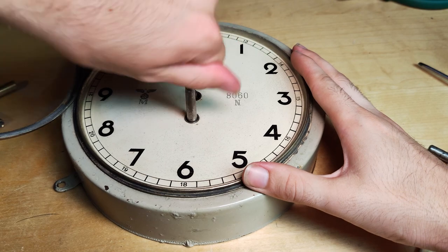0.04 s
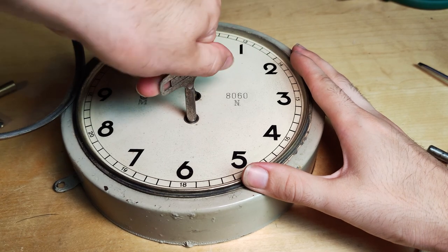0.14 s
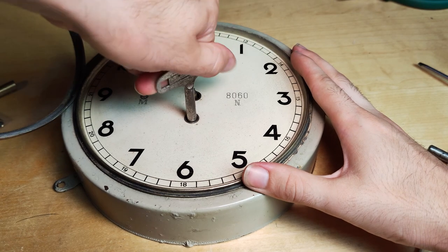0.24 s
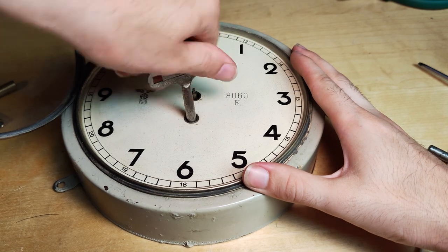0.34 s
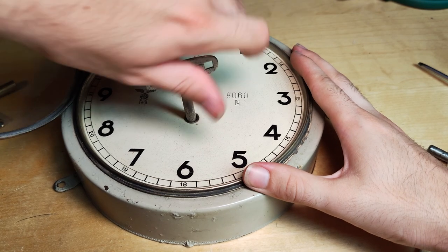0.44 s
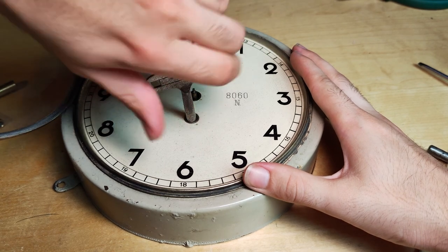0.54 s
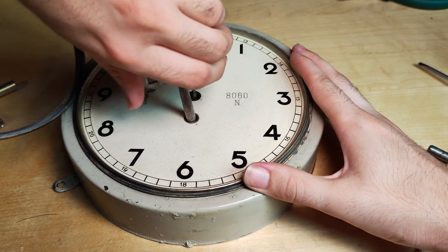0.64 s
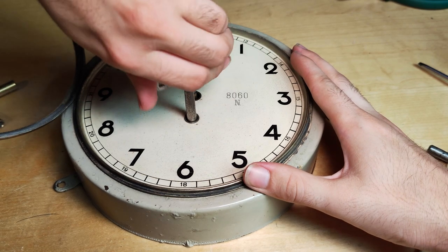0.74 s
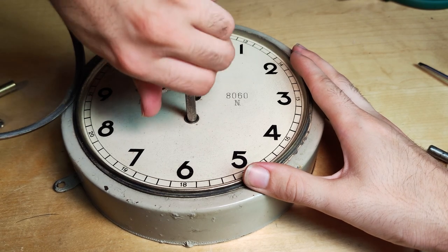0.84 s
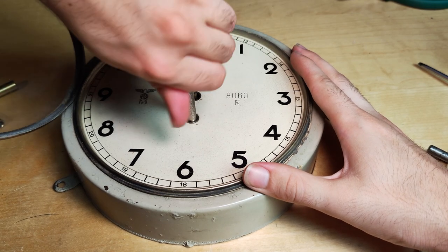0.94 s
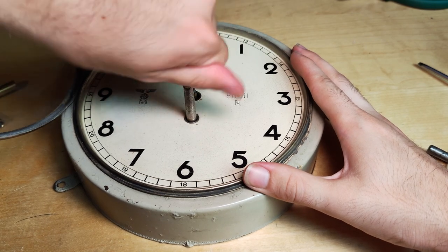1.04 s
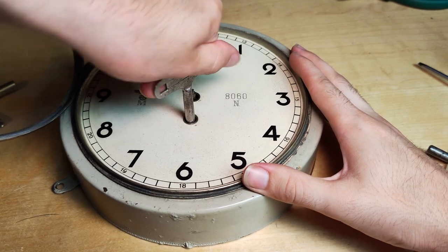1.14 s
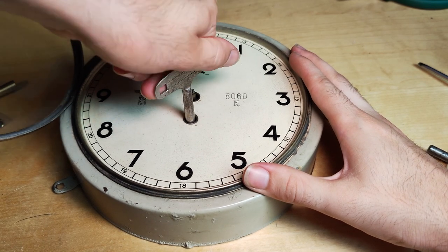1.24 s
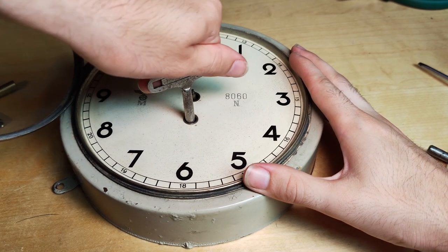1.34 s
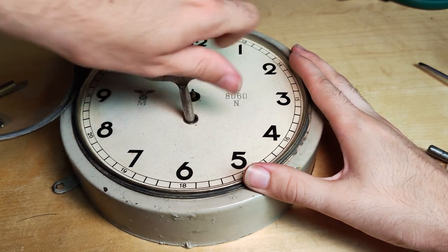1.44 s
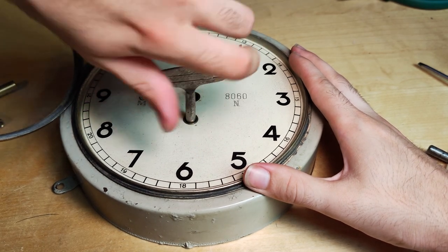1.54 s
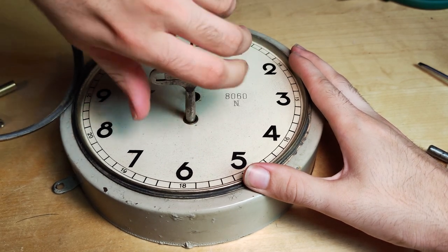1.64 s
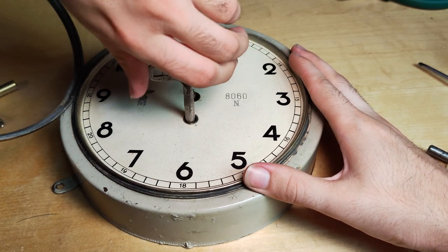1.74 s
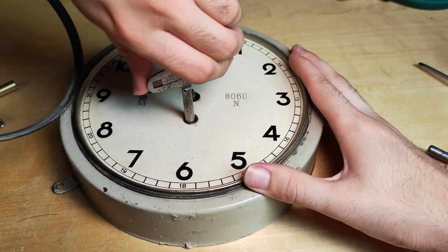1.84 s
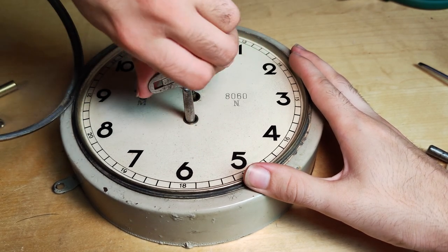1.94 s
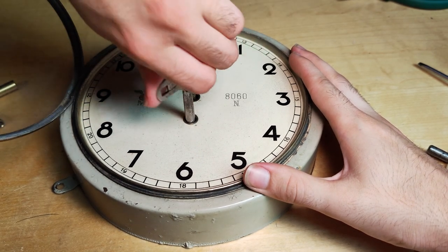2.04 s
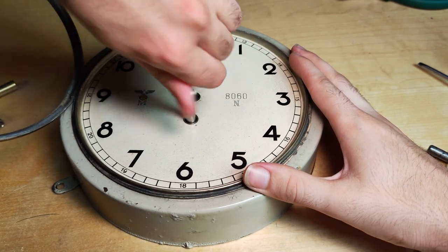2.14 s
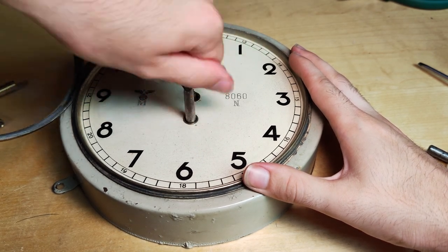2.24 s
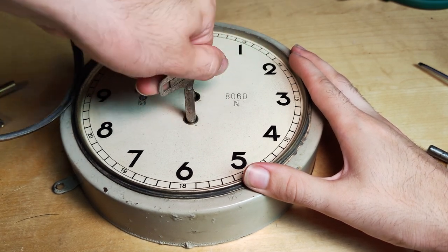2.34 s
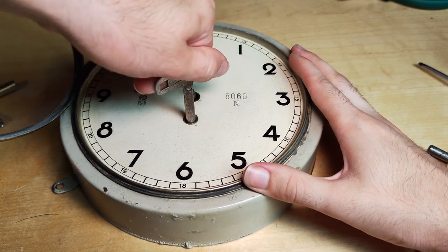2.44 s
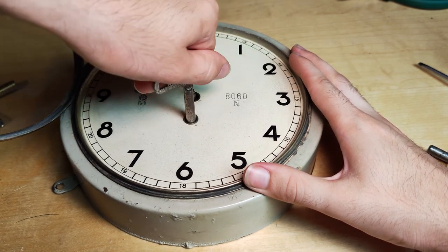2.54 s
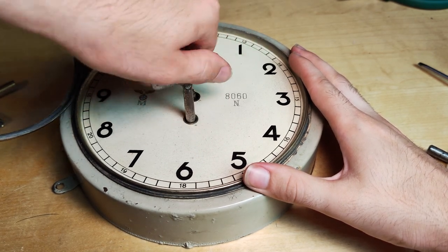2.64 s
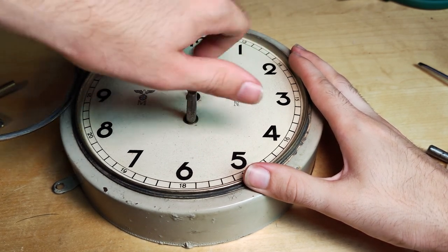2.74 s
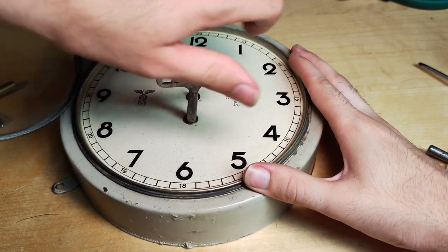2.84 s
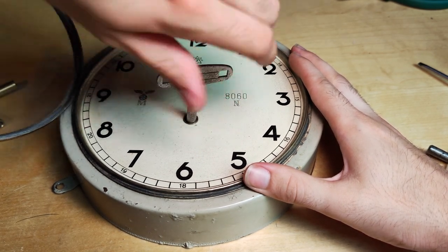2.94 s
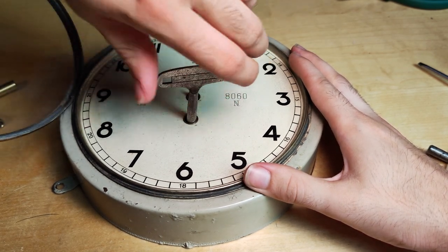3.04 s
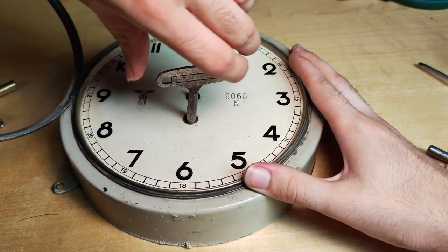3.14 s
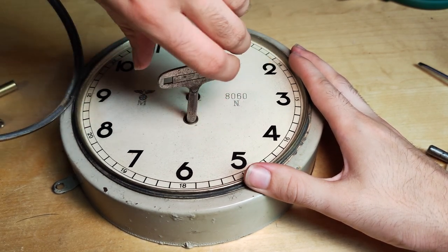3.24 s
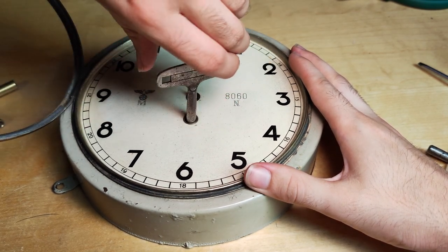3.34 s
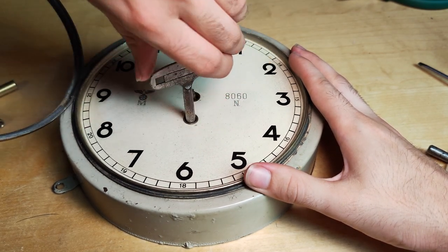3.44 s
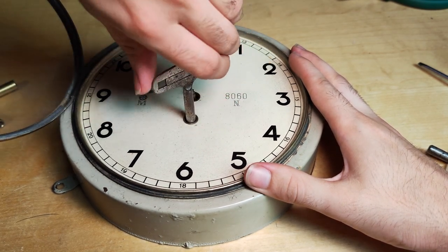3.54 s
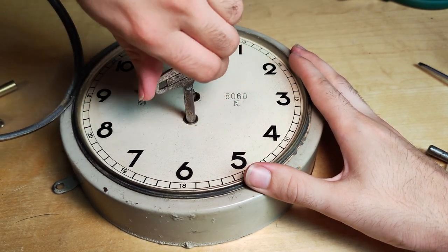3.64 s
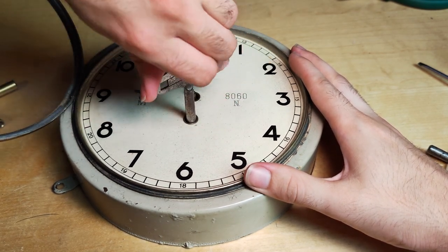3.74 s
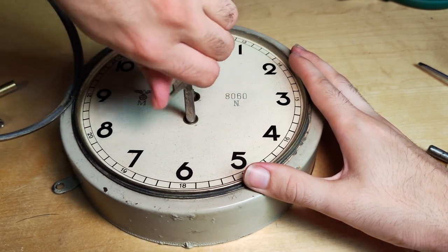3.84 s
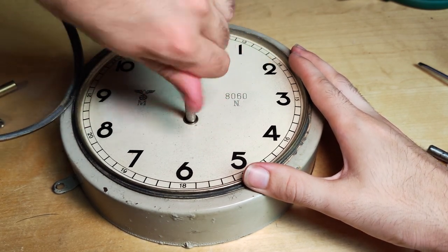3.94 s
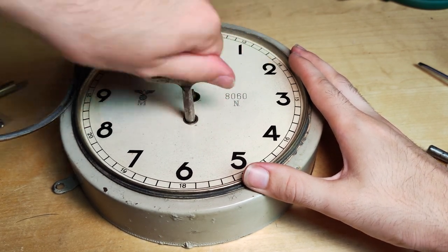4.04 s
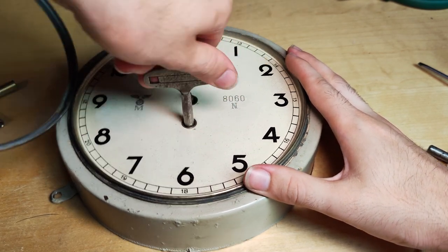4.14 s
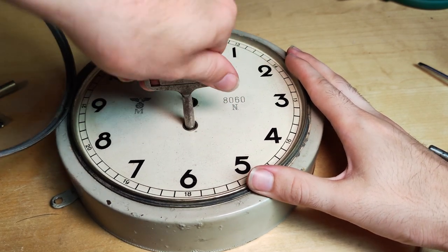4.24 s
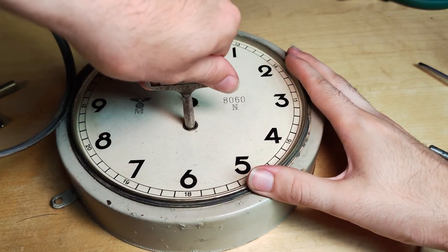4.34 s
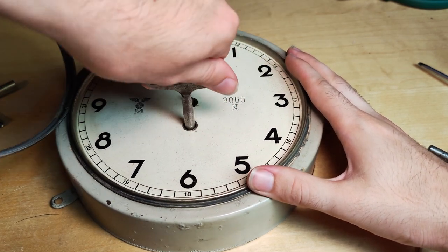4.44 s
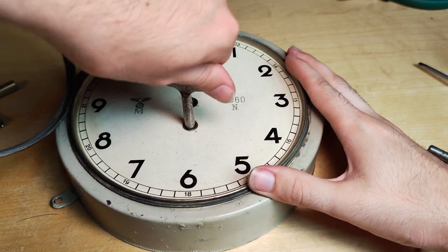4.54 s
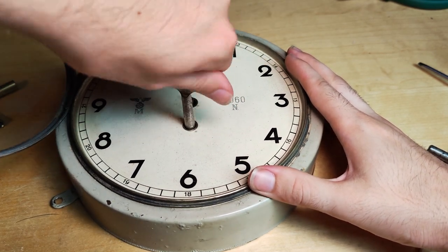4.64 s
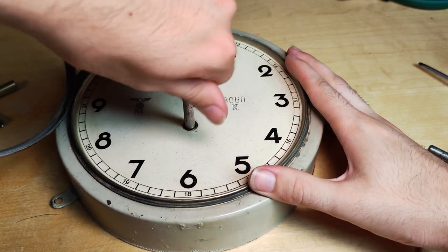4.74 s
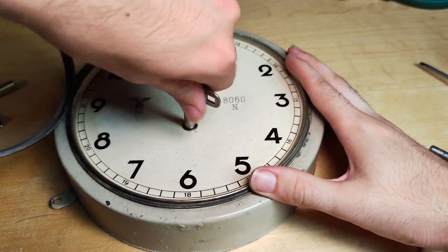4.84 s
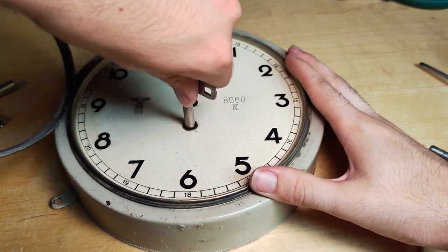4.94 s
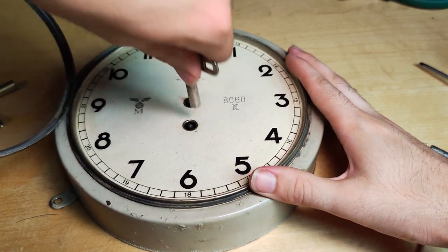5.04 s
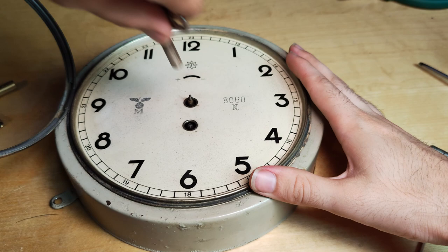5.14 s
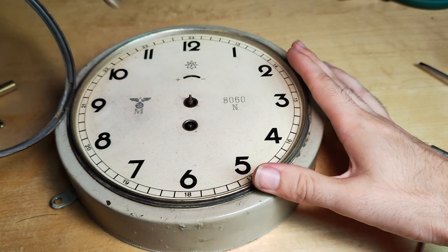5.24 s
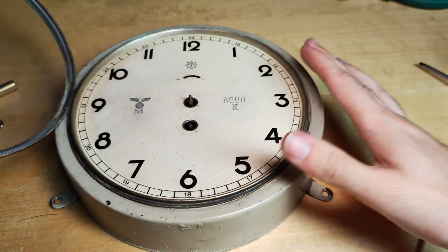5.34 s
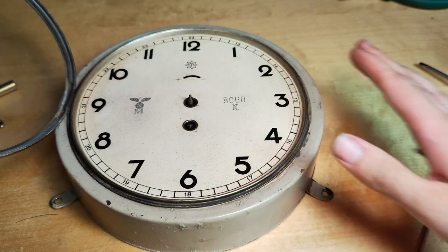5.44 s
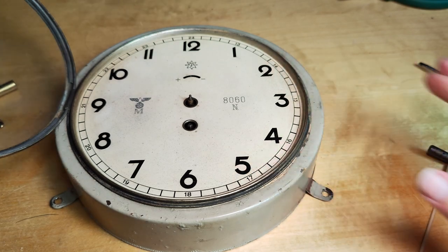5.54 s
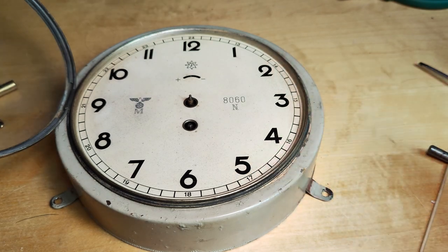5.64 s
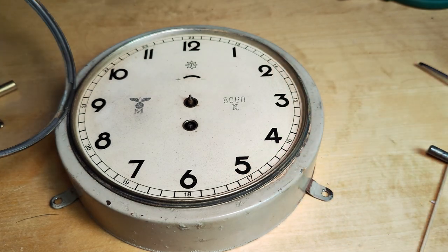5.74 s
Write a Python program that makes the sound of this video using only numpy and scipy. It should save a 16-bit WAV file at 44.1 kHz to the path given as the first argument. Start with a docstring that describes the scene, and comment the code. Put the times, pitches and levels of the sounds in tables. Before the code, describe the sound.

A metal wall clock lying on a wooden bench is wound with a key, heard very close in a small, quiet workshop with a short diffuse tail and soft airy hiss. At 0-0.25 s eight rapid, crisp pawl clicks run at about 30 per second, each a bright steel snap with brassy rattle and a short dial knock around 1.2 kHz. Hard key clacks follow at 0.3 and 0.9 s, with dull hollow finger thuds between. Similar runs come at 1.0-1.2 and 2.15-2.45 s, separated by clacks, a cluster of bumps near 1.6 s and low bench nudges. After 2.8 s it is calmer, with faint thin ticks. A clack at 3.85 s precedes the last, slightly slower run of five clicks at 3.95-4.15 s. Bumps and small rubs fade until the key scrapes out around 5.05 s; only delicate uneven ticking, a tiny rub and room air remain to about 6 s.

```python
"""Winding a wall clock

A wall clock lying on a wooden bench is wound with a key: four turns, each a run of pawl clicks that ring dial and works.
The key clacks as it takes up and gives back the spring's load; fingers bump it, thudding the case, and it rubs and taps.
The escapement ticks faintly; at the end the key scrapes out of its hole. Small, quiet workshop, heard from close by.
Blows excite banks of decaying modes, one bank a part; filtered noise gives the rasps, the room's tail and its air."""
import sys
import numpy as np
from scipy import signal
from scipy.fft import rfft, irfft
from scipy.io import wavfile

SR = 44100
rng = np.random.default_rng(int(sys.argv[2]) if len(sys.argv) > 2 else 0)


def digitize_waveform(pressure):
    """Quantize a signal to 16-bit integers and store it at the path in sys.argv[1].

    Rows of a 2-D input are taken as channels; values are limited to [-1, 1].
    """
    field = np.atleast_2d(pressure).T
    bounded = np.clip(field, -1, 1)
    quanta = np.round(bounded * 32767).astype(np.int16)
    wavfile.write(sys.argv[1], SR, quanta)


N = 255780  # length of the scene (samples)
T = np.arange(SR // 4) / SR  # time since a blow (s)
SIDES = np.array([[1], [-1]])  # left, right

# modes of the dial: [pitch_hz, relative_level_db, t60_s]
DIAL_MODES = [(805, -14, .05), (915, -6, .07), (972, -5, .07), (1044, 1, .08), (1090, 1, .06),
              (1200, -2, .05), (1297, 1, .07), (1355, -4, .05), (1419, -1, .07)]

# level of each part under a bump or a rub: (dB at hardness 0, dB at hardness 1)
TOUCH_DIAL_DB, TOUCH_PLATES_DB = (-22.5, 1.5), (-31, -5)
SLIPS_PER_S = 200  # mean rate at which each point of contact slips in a rub or scrape


def teeth():
    """Ratchet kinematics: the spacing of the teeth in time gives the speed of the key."""
    # the pawl drops off a tooth, one list for each turn of the key:
    # [start_s, click_strength_db, knock_peak_db, knock_pitch_hz]
    turns = [
        [(.0099, -1, -32, 1240), (.0518, -4.5, -26.5, 1195), (.0871, -3, -24.5, 1240), (.1119, -2.5, -24, 1200),
         (.1354, -2, -24.5, 1180), (.160, -2.5, -25, 1120), (.1848, -0.5, -24.5, 1140), (.233, -2, -25.5, 1250)],
        [(1.0094, 0, -23, 1164), (1.0657, 0.5, -19, 1150), (1.0993, -3, -24.5, 1190),
         (1.1255, -2.5, -23.5, 1280), (1.1525, -3.5, -26.5, 1190), (1.1844, -0.5, -22.5, 1160),
         (1.2238, -1.5, -23.5, 1140)],
        [(2.1617, -1, -29, 1170), (2.2223, -3, -25, 1300), (2.2568, -0.5, -21, 1220), (2.285, -3.5, -23, 1230),
         (2.3144, -1, -24.5, 1280), (2.3457, -0.5, -21.5, 1170), (2.3796, -1, -22.5, 1130),
         (2.4262, 2, -22.5, 1240)],
        [(3.9654, 0, -21.5, 1180), (4.0202, 0.5, -22, 1220), (4.062, 0, -22, 1180), (4.1046, -1, -22.5, 1300),
         (4.1332, -0.5, -24.5, 1190)],
    ]
    usual_teeth_per_s = 34.6
    for turn in turns:
        times, strength, knock_db, hz = np.transpose(turn)
        doublings = np.log2(1 / np.gradient(times) / usual_teeth_per_s)
        yield from zip(times, strength, knock_db, hz, doublings)


def ratchet(case, dial, plates, steel):
    """Impact excitation: the pawl snaps off each tooth and the shock runs through plates and dial into the case."""
    # level at the usual speed, and the change for each doubling: faster is brighter
    steel_base_db, steel_speed_db = -31.5, 7
    plates_base_db, plates_speed_db = -37.5, 3.5
    out = np.zeros((2, N))
    for s, db, knock_db, hz, speed in teeth():
        steel_db = db + steel_base_db + steel_speed_db * speed
        plates_db = db + plates_base_db + plates_speed_db * speed
        add(out, s - .0007, undb(steel_db - 8.5) * snap(t60=0.0051, lo_hz=3480, rise_s=0.0016))
        # the two corners of the tip land a moment apart, which colours every click differently
        add(out, s + 0.0006, undb(steel_db - 3.5) * chatter(steel(), span_s=0.0014, count=2))
        add(out, s, undb(knock_db + 2.0 * SIDES) * knock(hz, ring_share=0.45))
        works = undb(plates_db + .5) * chatter(plates(), span_s=.001, count=2)
        add(out, s + 0.001116, undb(knock_db - 14) * dial() + works)
        add(out, s + 0.00173, undb(db - 42.5) * case(570))
        rasp = band(snap(t60=0.003, lo_hz=1470, rise_s=0.000095), 1200, 4200, order=1)
        add(out, s + .003, undb(plates_db - 7.5) * judder(rasp, t60=0.067, per_s=400))
        # the pawl bounces once on the next tooth
        bounce = undb(plates_db - 3.5) * plates() + undb(steel_db - 11.5) * steel()
        add(out, s + rng.uniform(0.003, 0.0058), bounce)
    return out


def key_clacks(case, dial, plates, steel):
    """Contact stiffness: the key's square rocks against the arbor; a harder contact excites higher modes."""
    # the key takes up or gives back the load: [start_s, reference_level_db, hardness (0-1)]
    clacks = [(0.3166, -33.5, 0.93), (0.3867, -40.5, 0.26), (0.3983, -44, 0.48), (0.9262, -33.5, 0.89),
              (1.3377, -34, 0.92), (1.396, -36, 0.47), (1.5235, -37, 0.62), (2.0535, -37, 0.87),
              (2.505, -51, 0), (2.5151, -34, 0.95), (2.598, -42.5, 0), (2.801, -42, 0.32),
              (3.8431, -36, 0.87), (4.4242, -48.5, 0.85), (4.9926, -46, 0), (5.034, -41, 0.26)]
    # level of each part relative to the reference: (dB at hardness 0, dB at hardness 1)
    dial_ends, plates_ends, steel_ends = (-1.5, -5), (-27, -2), (-75, -6.5)
    out = np.zeros((2, N))
    for s, case_db, hardness in clacks:
        dial_db = by_hardness(case_db, hardness, dial_ends)
        plates_db = by_hardness(case_db, hardness, plates_ends)
        steel_db = by_hardness(case_db, hardness, steel_ends)
        rattle = judder(snap(t60=0.0045, lo_hz=1480, rise_s=0.00016), t60=0.08, per_s=900)
        # a faint dial and plate ring leads into the clack
        add(out, s - .007, undb(dial_db - 15) * dial() + undb(plates_db - 19) * plates())
        add(out, s - .002, undb(plates_db + 6.5) * band(rattle, 1400, 3830, order=1))
        brass = undb(plates_db + 1.0) * chatter(plates(), span_s=0.001947, count=2)
        add(out, s, brass + undb(steel_db - 2.5) * chatter(steel(), span_s=0.00011))
        # a second corner lands
        add(out, s + rng.uniform(0.005, 0.012), undb(plates_db - 5.5) * plates())
        add(out, s - .001, undb(dial_db + 9 + .5 * SIDES) * knock(1110, ring_share=0.48))
        ring = undb(dial_db - 2.5) * chatter(dial(1400), span_s=0.0031)
        shaken = undb(dial_db - 5.0) * judder(flex(1150, rise_s=0.00086), t60=0.058, per_s=500)
        add(out, s, ring + shaken)
        add(out, s + 0.00056, undb(case_db - 4.5) * case(1160))
    return out


def finger_bumps(case, dial, plates):
    """Low-frequency excitation: soft pushes on the key rock the movement and thud the case."""
    # fingers bump the key:
    # [start_s, reference_level_db, hardness (0-1), thud_pitch_hz, time_to_crest_s]
    bumps = [(.447, -44, 0.4, 368, 0.0056), (.468, -44.5, 0.24, 192, .01), (.509, -37.5, 0.43, 358, 0.0077),
             (.669, -31, 0.23, 423, 0.006), (.68, -37.5, 0.4, 282, 0.013), (.712, -47, 0.69, 410, 0.003),
             (.724, -43, 0, 271, 0.01), (.846, -39, 0.76, 385, 0.0085), (.864, -36, .2, 351, 0.0067),
             (.876, -38, 0, 286, 0.0062), (1.407, -38, 0.78, 551, 0.0057), (1.555, -27.5, 0.37, 390, 0.004),
             (1.565, -31, .55, 380, 0.0031), (1.58, -34.5, 0.6, 420, 0.0043),
             (1.596, -33.5, 0.6, 349, 0.0051), (1.609, -31, 0, 330, .007), (1.677, -31, .25, 400, 0.0056),
             (1.807, -35, 0.66, 323, 0.0085), (1.822, -32.5, 0, 374, .006), (1.95, -35.5, .42, 295, .009),
             (2.431, -43, 0, 410, 0.0054), (2.712, -39, .32, 250, .007), (2.809, -30, 0.39, 415, 0.0079),
             (3.444, -46, 0.1, 415, 0.0044), (3.596, -36, 0, 396, 0.005), (4.149, -32, 0.3, 270, 0.0048),
             (4.213, -36.5, 0.35, 439, 0.013), (4.261, -43, 0.5, 348, 0.011),
             (4.555, -43, 0.9, 447, 0.0048), (4.671, -38.5, 0.57, 388, 0.0064),
             (4.766, -47.5, 0.5, 420, 0.0078), (4.821, -49.5, 0.76, 430, .006),
             (4.889, -47, 0.37, 310, 0.0089), (4.939, -51, 0.94, 453, 0.0061)]
    out = np.zeros((2, N))
    for s, case_db, hardness, hz, rise_s in bumps:
        dial_db = by_hardness(case_db, hardness, TOUCH_DIAL_DB)
        plates_db = by_hardness(case_db, hardness, TOUCH_PLATES_DB)
        add(out, s - .001, undb(case_db - 4.0) * thud(hz, rise_s))
        add(out, s + 0.00303, undb(case_db - 7.5) * case(hz))
        # skin scuffs over the key
        add(out, s, undb(dial_db - 5.5) * judder(flex(1080, rise_s=0.0011), t60=0.065, per_s=740))
        ring = undb(dial_db - 4.5) * chatter(dial(950), span_s=0.0094)
        add(out, s + 0.00096, ring + undb(plates_db - 3.0) * chatter(grit(plates), span_s=0.00434))
        # the case rocks back on the bench, softer and lower
        add(out, s + rng.uniform(0.012, .022), undb(case_db - 14) * case(0.65 * hz))
    return out


def key_rubs(case, dial, plates, count=4):
    """Stick-slip friction: a swell of tiny uneven blows, shared among a few points of contact."""
    # the key rubs in its socket:
    # [middle_s, length_s, reference_level_db, hardness (0-1), rub_pitch_hz]
    rubs = [(0.836, 0.028, -51, 0.66, 400), (0.913, .03, -51, 0.1, 350), (0.993, 0.048, -49, .67, 420),
            (1.548, 0.023, -46.5, 0.8, 450), (1.6, 0.073, -47.5, 0.35, 546), (1.796, .039, -50, 0.64, 448),
            (3.948, .023, -45, 0.5, 430), (4.23, .06, -43.5, 0.88, 500), (4.256, 0.044, -42, 0.93, 620),
            (4.296, 0.05, -51, 0.67, 390), (4.799, .06, -59, 0.57, 420), (4.879, 0.12, -50, 0.41, 397),
            (5.018, 0.039, -57.5, 0.94, 550), (5.062, 0.091, -47.5, 0.6, 503),
            (5.361, 0.032, -54.5, 0.6, 380)]
    out = np.zeros((2, N))
    for s, length, case_db, hardness, hz in rubs:
        dial_db = by_hardness(case_db, hardness, TOUCH_DIAL_DB)
        plates_db = by_hardness(case_db, hardness, TOUCH_PLATES_DB)
        n = int(length * SR)
        for _ in range(count):
            slips = (rng.random(n) < SLIPS_PER_S / SR) * rng.uniform(-1.06, 1, n) * np.hanning(n)
            # energy in proportion to the length, whatever the number of slips
            slips *= np.sqrt(40 * length / count / (np.sum(slips ** 2) + 1e-9))
            body = undb(case_db) * case(hz) + undb(dial_db) * dial(900) + undb(plates_db) * grit(plates)
            # each slip also rasps, metal on metal
            body = body + undb(plates_db - 1) * snap(t60=0.02, lo_hz=2200, rise_s=0.00017)
            add(out, s - length / 2, signal.fftconvolve(body, slips[None], axes=1))
    return band(out, 136, 6600, order=1)


def withdrawal(dial, plates, count=5):
    """Stick-slip friction: the key's shank scrapes past the rim; its catches flick the dial at several pitches."""
    from_s, to_s = 5.036, 5.08
    level_db, middle_hz = -36, 910
    out = np.zeros((2, N))
    n = int((to_s - from_s) * SR)
    for _ in range(count):
        catches = (rng.random(n) < SLIPS_PER_S / SR) * rng.choice([-1, 1], n) * np.hanning(n) ** .5
        catches /= np.sqrt(count * np.sum(catches ** 2) + 1e-9)
        flick = flex(middle_hz * 2 ** (0.42 * rng.standard_normal()), rise_s=0.0015)
        flick = flick + undb(-7.0) * dial(middle_hz) + undb(-14) * grit(plates)
        add(out, from_s, undb(level_db) * signal.fftconvolve(flick, catches[None], axes=1))
    return out


def key_taps(key):
    """Free vibration: the loose key taps its arbor and rings."""
    # [start_s, level_db]
    taps = [(.3875, -48.5), (.512, -53.5), (4.556, -52), (4.825, -59), (4.941, -56.5)]
    return strikes(taps, key)


def bench_shoves(bench):
    """Structure-borne sound: the hand shoves the whole clock against the bench, whose top resonates."""
    # [start_s, level_db]
    shoves = [(.345, -44.5), (.455, -47), (1.52, -44.5), (1.555, -47.5), (1.95, -47), (2.515, -47.5),
              (4.673, -48.5)]
    return strikes(shoves, bench)


def escapement(plates, steel):
    """Impact pairs: a tooth lands on the lever with a thin tick; a weaker touch follows."""
    # it beats a little over four times a second, unevenly; the ticks that stand clear of the winding:
    # [start_s, reference_level_db]
    ticks = [(0.502, -56.5), (0.683, -54.5), (1.5823, -46), (1.7252, -56), (1.9877, -51.5), (2.636, -58.5),
             (2.861, -50.5), (3.085, -52.5), (3.3253, -50), (3.548, -55.5), (3.802, -55.5), (4.7, -54),
             (4.892, -57.5), (5.1206, -50.5), (5.3328, -52), (5.592, -50)]
    out = np.zeros((2, N))
    for s, db in ticks:
        tick = undb(db - 0.5) * snap(t60=0.069, lo_hz=2580, rise_s=0.00016)
        add(out, s, tick + undb(db - 11.5) * steel())
        touch = undb(db - 14.0) * plates() + undb(db - 8.5) * steel()
        add(out, s + rng.uniform(0.0054, 0.0082), touch)
    return band(out, 670, 4800, order=1)


def workshop(x, wet_db, low_t60, high_t60):
    """Reverberation: bench and walls return a short, diffuse, decaying tail."""
    noise = rng.standard_normal((2, len(T)))
    # the low part is more alike in both ears
    low = band(noise[0] + 0.39 * noise[1] * SIDES, 187, 990, order=2) * fade(low_t60)
    high = band(rng.standard_normal((2, len(T))), 900, 10800, order=1) * fade(high_t60)
    tail = (low + high) * (1 - np.exp(-(T / 0.0021) ** 2))
    tail /= np.sqrt(np.sum(tail ** 2) / 2)
    return x + undb(wet_db) * signal.fftconvolve(x, tail, axes=1)[:, :N]


def room_tone():
    """Stationary noise of a shaped spectrum: a low murmur of air under a wide even hiss."""
    # spectral density of the air: [pitch_hz, relative_density_db (dB per Hz)]
    hush = [(20, -8.5), (55, -11), (100, 2.5), (135, 2), (230, -2.5), (295, -0.5), (640, -13),
            (2100, -18.5), (4000, -26), (7300, -36.5), (9800, -29), (13800, -23.5), (15000, -76)]
    level_db = -62.5  # rms of the two sides' mean
    f = np.maximum(np.arange(N // 2 + 1) * SR / N, 1)
    hz, db = np.transpose(hush)
    mid, side = rfft(rng.standard_normal((2, N))) * undb(np.interp(np.log(f), np.log(hz), db))
    # share of side to mid: the murmur is more alike in both ears than the hiss
    width = np.interp(np.log(f), np.log([40, 130, 2000]), [.65, .28, .9])
    air = irfft(mid + width * side * SIDES, N)
    return air * undb(level_db) / np.std(air.mean(axis=0))


def part(modes, spread, rattle_db, rattle_t60, crack_db, lo_hz, hi_hz, linger_db, left_db):
    """Modal synthesis: a part rings as a sum of decaying modes; returns a function that strikes it once."""
    contact_octaves = 1.3  # how narrowly a soft contact picks out the modes near its own pitch
    mode_drift = .007  # spread of the detuning from blow to blow, under the changing load (share)
    hz, db, t60 = np.transpose(modes)
    # the contact damps each mode quickly; once it has let go, a faint ring lingers
    decay = fade(t60[:, None]) + undb(linger_db) * t60[:, None] / t60.mean() * fade(0.21)
    rings = (np.exp(2j * np.pi * hz[:, None] * T) * decay).astype(np.complex64)
    # each mode radiates in its own pattern and reaches the two ears with its own phase
    ears = np.exp(1j * spread * SIDES * (-1) ** np.arange(len(hz)))

    def strike(centre_hz=None):
        """Modal participation: the point of contact weights the modes; loose wheels rattle and keep feeding them."""
        chance = rng.standard_normal((2, len(hz)))
        # divided by t60, so that the level is the height of a mode's spectral peak
        weight = undb(db + 5 * chance[0]) / t60 * np.exp(1j * chance[1])
        if centre_hz:
            weight = weight / (1 + (np.log2(hz / centre_hz) / contact_octaves) ** 2)
        drift = np.exp(2j * np.pi * mode_drift * hz.mean() * rng.standard_normal() * T)
        ring = (((ears * weight).astype(np.complex64) @ rings) * drift).imag
        ring = band(ring, 0.85 * hz[0], 1.088 * hz[-1], order=3)
        rattle = rng.standard_normal(len(T)) * (rng.random(len(T)) < 1500 / SR) * fade(rattle_t60)
        drive = (T == 0) + undb(rattle_db) * rattle / np.linalg.norm(rattle)
        ring = signal.fftconvolve(ring, drive[None], axes=1)[:, :len(T)]
        # countless weaker modes blur into a short toneless crack
        near, apart = rng.standard_normal((2, len(T)))
        crack = band((near + spread * apart * SIDES) * fade(rattle_t60), lo_hz, hi_hz)
        return unit(unit(ring) + undb(crack_db) * unit(crack)) * undb(SIDES * left_db / 2)
    return strike


def knock(hz, ring_share):
    """Modal superposition: a blow at the dial's centre starts its modes in step, then they beat against each other."""
    crest_s, width_s = .0021, .0012  # time to the crest of the swing, and its half-width
    mode_hz, db, t60 = np.transpose(DIAL_MODES)
    late = T - crest_s
    weight = undb(db + 4.5 * rng.standard_normal(len(db)))
    modes = np.cos(2 * np.pi * mode_hz[:, None] * late) * fade(t60[:, None])
    ring = weight @ modes / weight.sum()
    crest = np.exp(-(late / width_s) ** 2)
    # the dial swings as a whole for about three cycles
    swing = crest * np.cos(2 * np.pi * hz * late)
    return (1 - ring_share) * swing + ring_share * ring * np.where(late < 0, crest, 1)


def flex(hz, rise_s):
    """Bending: a sheet of metal swings as a whole for a few cycles before it breaks up into its modes."""
    swing = (T / rise_s) ** 2 * np.exp(-(T / rise_s) ** 2) * np.sin(2 * np.pi * hz * T)
    return unit(np.array([swing, swing]))


def thud(hz, rise_s):
    """Pressure-dependent stiffness: the case swings under a fingertip; its pitch settles as the pressure lets off."""
    sag, sag_s = 0.24, 0.012  # fall in pitch (share of hz), and its time constant
    # the pitch passes through hz at the crest
    pitch = hz * (1 + sag * (np.exp(-T / sag_s) - np.exp(-rise_s / sag_s)))
    swing = (T / rise_s) ** 2 * np.exp(-2 * T / rise_s) * np.sin(2 * np.pi * np.cumsum(pitch) / SR)
    return unit(np.array([swing, swing]))


def snap(t60, lo_hz, rise_s):
    """Broadband contact noise, metal on bare metal: a short noise burst with a slightly softened attack."""
    burst = rng.standard_normal((2, len(T))) * fade(t60) * (1 - np.exp(-(T / rise_s) ** 2))
    return unit(band(burst, lo_hz, 13400, order=2))


def chatter(x, span_s, count=4):
    """Repeated impact: a loose contact lands in several quick touches, each weaker."""
    out = np.zeros_like(x)
    for k in range(count):
        lag = int(span_s * SR * (k + rng.uniform(0, .8)) / count) if k else 0
        out[:, lag:] += undb(-1.5 * k) * x[:, :len(T) - lag]
    return unit(out)


def judder(x, t60, per_s):
    """Random impact train: loose wheels are shaken into a dying run of separate, uneven little blows."""
    blows = (rng.random(len(T)) < per_s / SR) * rng.standard_normal(len(T)) * fade(t60)
    return unit(signal.fftconvolve(x, blows[None], axes=1)[:, :len(T)])


def grit(plates):
    """Contact low-pass: a padded contact leaves out the top of the plates' ring."""
    return unit(band(plates(2400), 650, 2330, order=2))


def by_hardness(db, hardness, ends_db):
    """Contact stiffness: a harder contact passes more or less of the blow to a part, between two end levels."""
    return db + ends_db[0] + (ends_db[1] - ends_db[0]) * hardness


def strikes(events, body):
    """Linear superposition of single plain blows on one part."""
    out = np.zeros((2, N))
    for s, db in events:
        add(out, s, undb(db) * body())
    return out


def add(out, s, x):
    """Superposition: mix x into out at time s."""
    i = max(int(s * SR), 0)
    out[:, i:i + x.shape[1]] += x[:, :max(N - i, 0)]


def unit(x):
    """Energy normalisation: scale a ring so that its energy equals 10 ms at level 1."""
    return x / np.sqrt(np.sum(x ** 2) / 2 / (SR / 100))


def band(x, lo_hz, hi_hz, order=3):
    """Causal band-pass filtering."""
    sos = signal.butter(order, [lo_hz, min(hi_hz, SR / 2 - 1)], "band", fs=SR, output="sos")
    return signal.sosfilt(sos, x)


def fade(t60):
    """Viscous damping: exponential decay by 60 dB in t60 seconds."""
    return np.exp(-np.log(1000) * T / t60)


def undb(db):
    """Logarithmic level: decibels to gain."""
    return 10 ** (np.asarray(db) / 20)


def scene():
    """Shared resonators: all blows ring the same four parts of the clock, the key and the bench."""
    # modes of the pressed steel case: [pitch_hz, relative_level_db, t60_s]
    case_modes = [(127, -4, .14), (178, -4, .12), (255, -2, .08), (281, -1, .08), (362, 0, .06),
                  (411, 3, .08), (430, -3, .05), (505, -5, .05), (535, -4, .05), (591, 1, .065),
                  (668, -7, .035)]
    # modes of the movement's brass plates: [pitch_hz, relative_level_db, t60_s]
    plate_modes = [(1992, -3, .06), (2110, -1, .025), (2260, -3, .025), (2400, -5, .03), (2572, -1, .035),
                   (3120, 1, .018), (3326, 4, .04), (3393, 4, .04), (3590, 1, .025), (3730, 2, .025),
                   (3960, 3, .022), (4390, -1, .02), (4670, 0, .016), (5050, -4, .02), (5530, -4, .02),
                   (5712, -1, .022)]
    # modes of the steel pawl and its spring: [pitch_hz, relative_level_db, t60_s]
    steel_modes = [(6230, -3, .015), (7117, 0, .018), (8037, 2, .015), (8310, 1, .014), (8700, -3, .015),
                   (9000, -3, .018), (9350, -2, .018), (9600, -2, .018), (9900, 1, .018), (10320, -3, .03),
                   (10767, -3, .015), (11130, -3, .02), (11680, 2, .02), (12080, -1, .02), (13000, 3, .02),
                   (13500, 1, .022), (13900, 1, .02), (14174, 4, .024)]
    # modes of the key: [pitch_hz, relative_level_db, t60_s]
    key_modes = [(1790, -5, .03), (1900, -1, .03), (2020, 0, .035), (2650, -8, .03)]
    # modes of the bench top: [pitch_hz, relative_level_db, t60_s]
    bench_modes = [(110, -7, .15), (127, 0, .18), (155, -1, .13)]
    case = part(case_modes, spread=0.35, rattle_db=-3.5, rattle_t60=0.082, crack_db=-12.5,
                lo_hz=134, hi_hz=710, linger_db=-10, left_db=-0.5)
    dial = part(DIAL_MODES, spread=0.84, rattle_db=-25.0, rattle_t60=0.059, crack_db=-2.5,
                lo_hz=843, hi_hz=1440, linger_db=-49, left_db=-3.0)
    plates = part(plate_modes, spread=0.95, rattle_db=-4, rattle_t60=0.083, crack_db=-4,
                  lo_hz=1670, hi_hz=4320, linger_db=-74.0, left_db=-1.0)
    steel = part(steel_modes, spread=0.81, rattle_db=2.0, rattle_t60=0.026, crack_db=-6,
                 lo_hz=5000, hi_hz=14600, linger_db=-32, left_db=3.0)
    key = part(key_modes, spread=0.68, rattle_db=-9, rattle_t60=0.027, crack_db=-5,
               lo_hz=1650, hi_hz=2030, linger_db=-56, left_db=2.5)
    bench = part(bench_modes, spread=0.18, rattle_db=0, rattle_t60=0.18, crack_db=-23,
                 lo_hz=98, hi_hz=165, linger_db=-17, left_db=-2.5)
    winding = ratchet(case, dial, plates, steel) + key_clacks(case, dial, plates, steel)
    handling = finger_bumps(case, dial, plates) + key_rubs(case, dial, plates)
    handling = handling + withdrawal(dial, plates) + key_taps(key) + bench_shoves(bench)
    blows = winding + handling + escapement(plates, steel)
    return workshop(blows, wet_db=-11.0, low_t60=0.25, high_t60=0.25) + room_tone()


def record(dry):
    """Band limitation: a steep elliptic low-pass cuts the top."""
    top_hz = 14400
    return signal.sosfilt(signal.ellip(8, .2, 70, top_hz, fs=SR, output="sos"), dry)


dry = scene()
out = record(dry)
digitize_waveform(out)
```